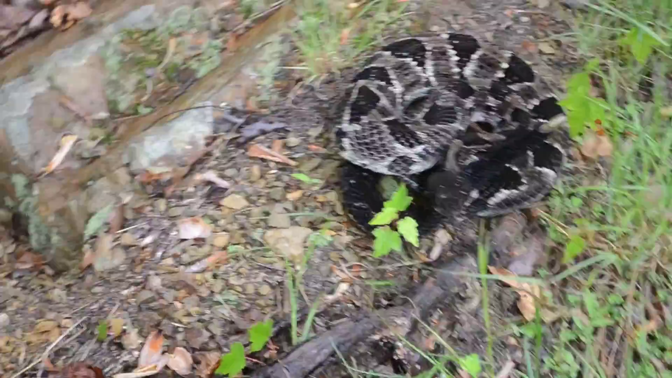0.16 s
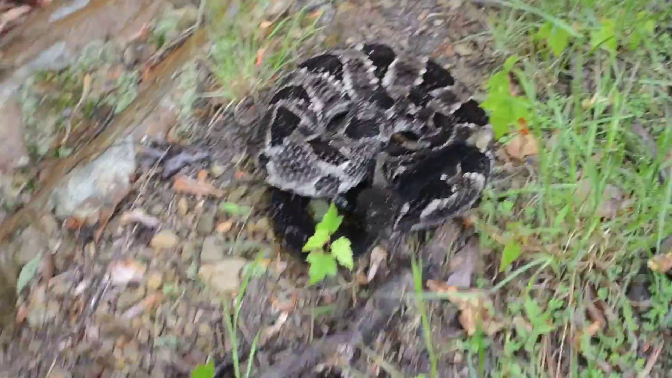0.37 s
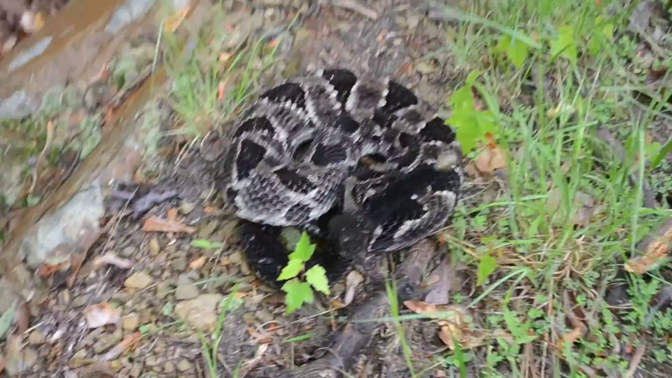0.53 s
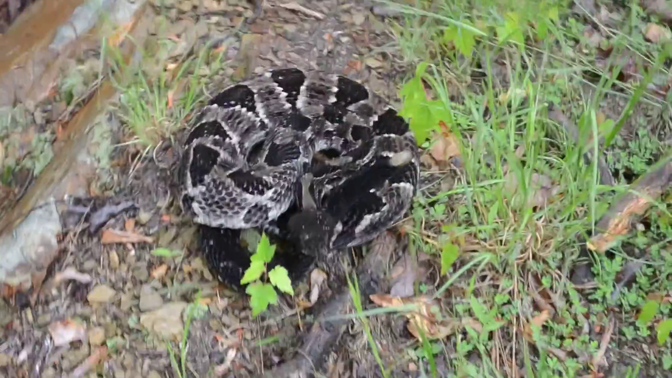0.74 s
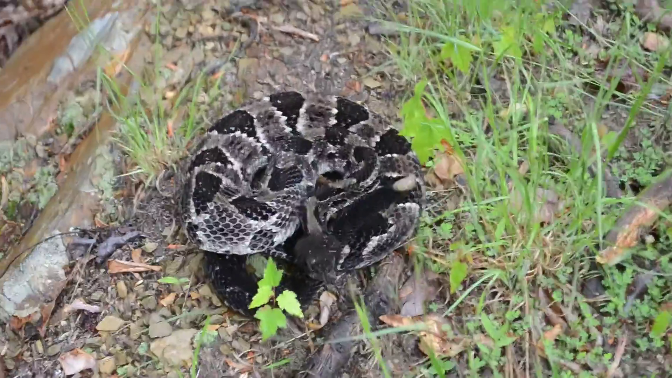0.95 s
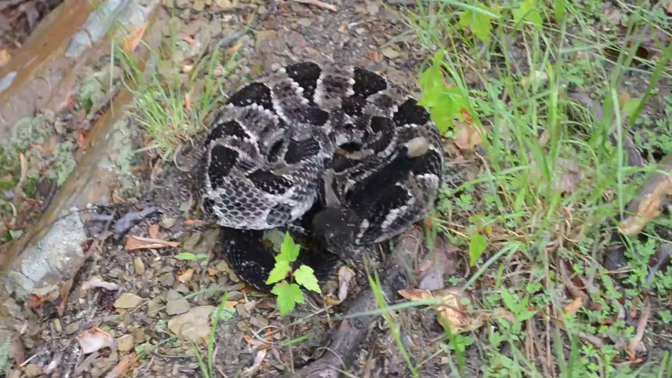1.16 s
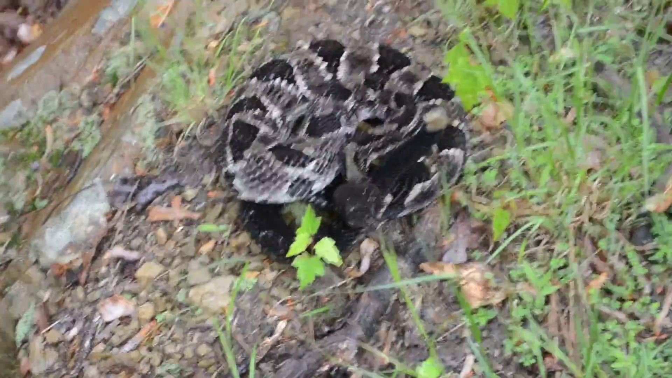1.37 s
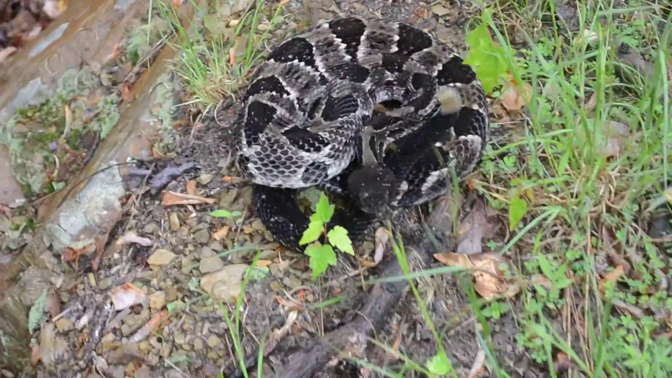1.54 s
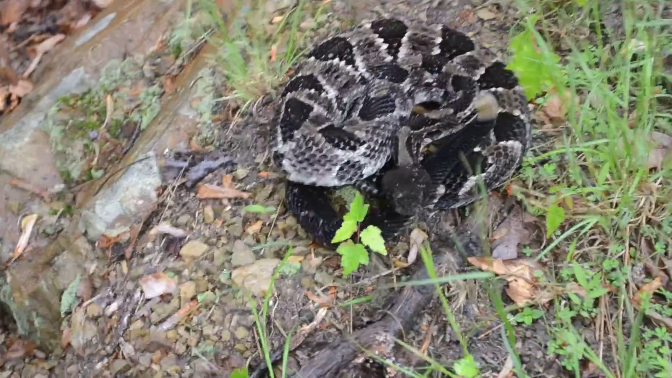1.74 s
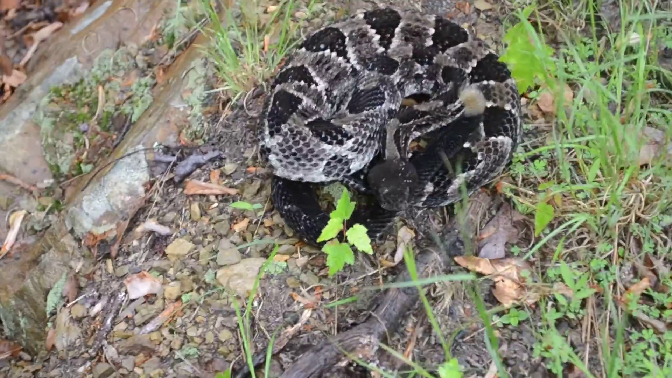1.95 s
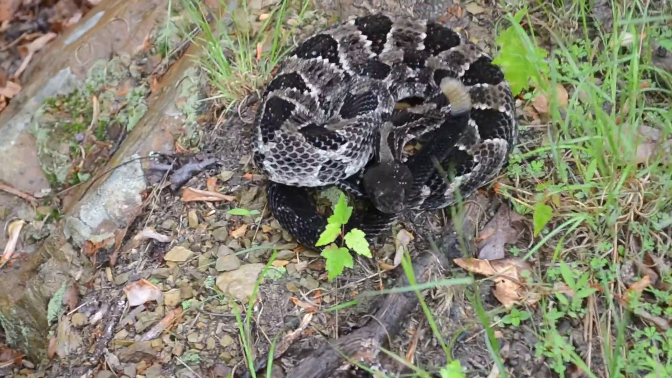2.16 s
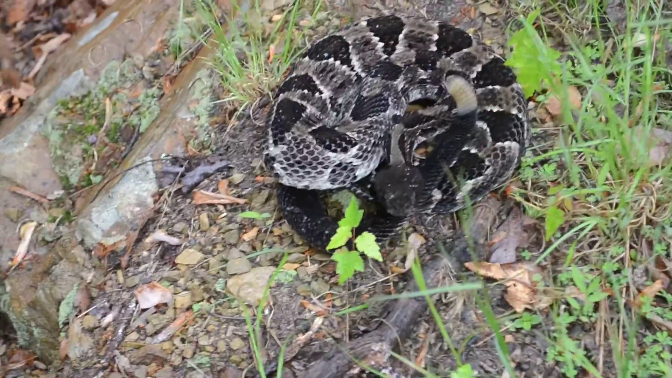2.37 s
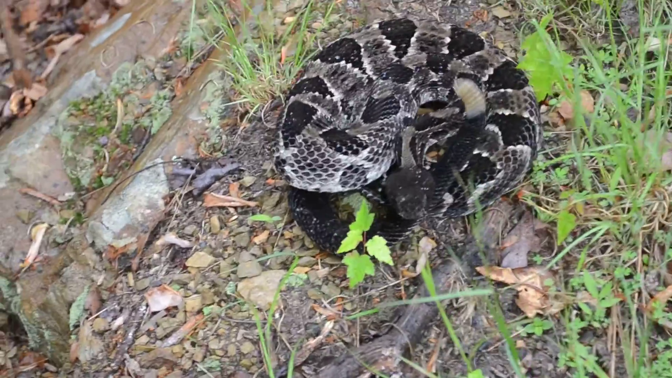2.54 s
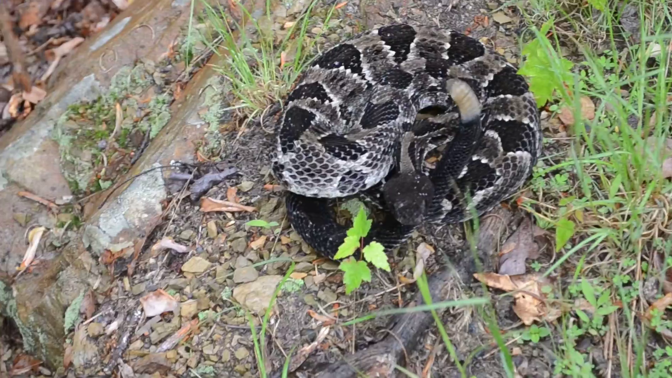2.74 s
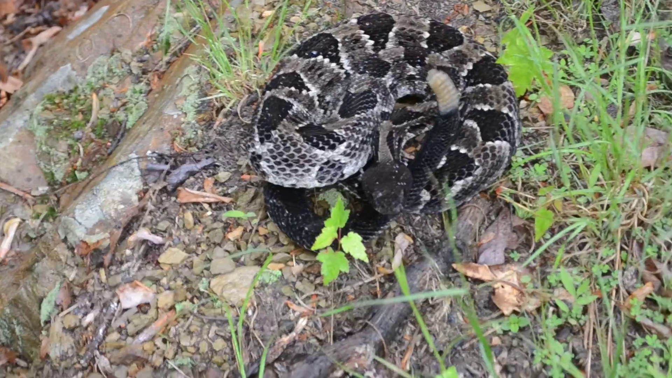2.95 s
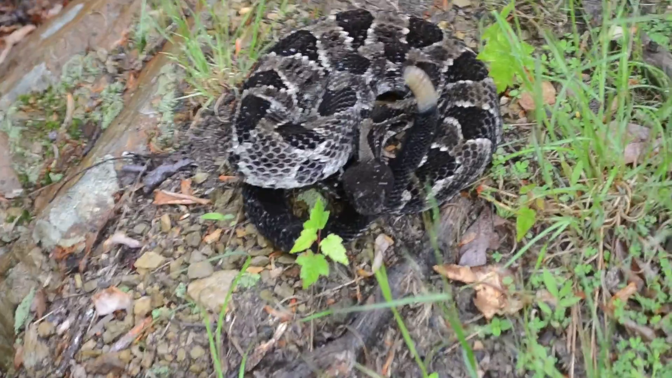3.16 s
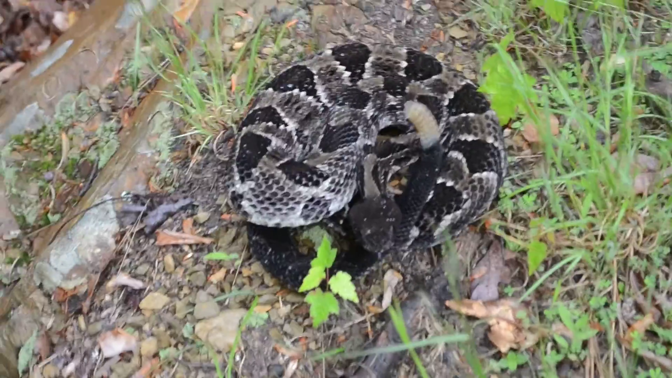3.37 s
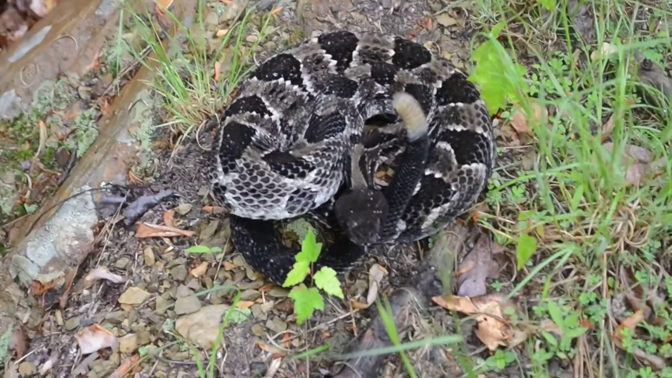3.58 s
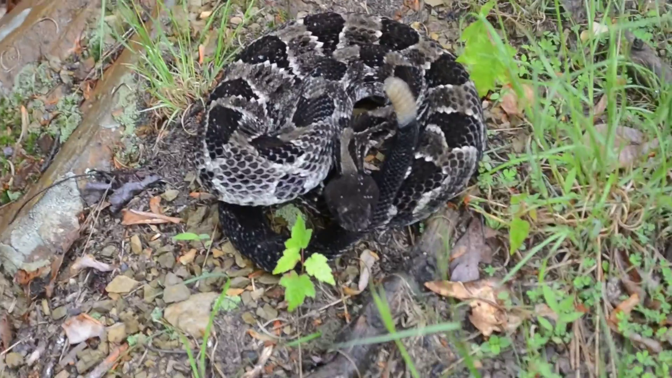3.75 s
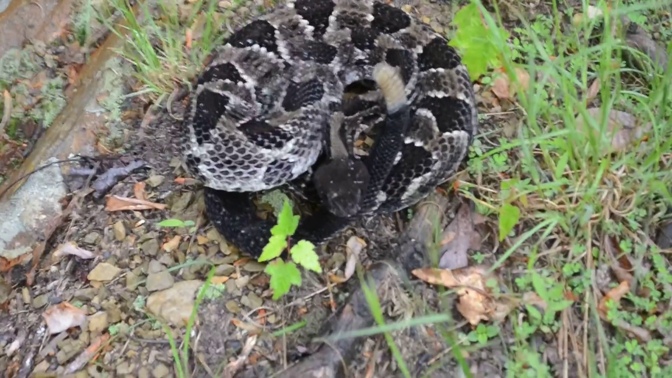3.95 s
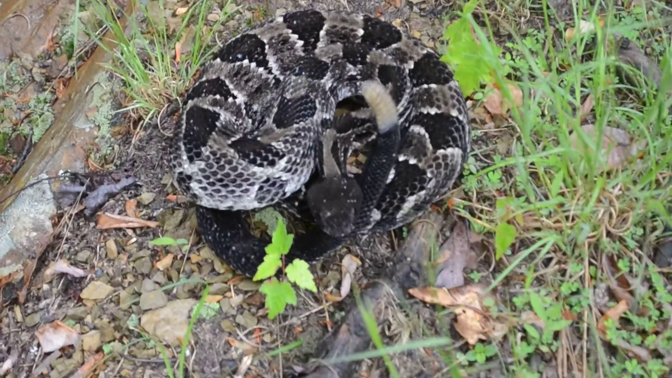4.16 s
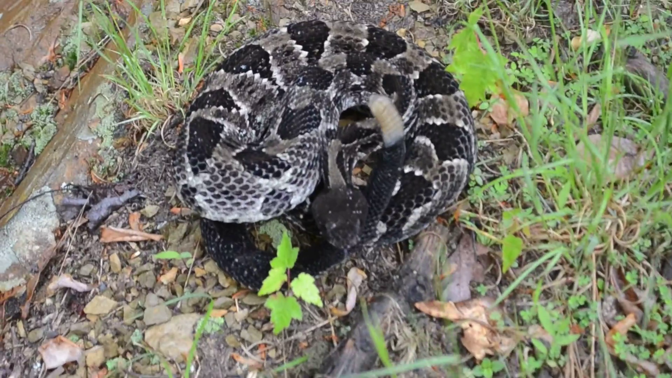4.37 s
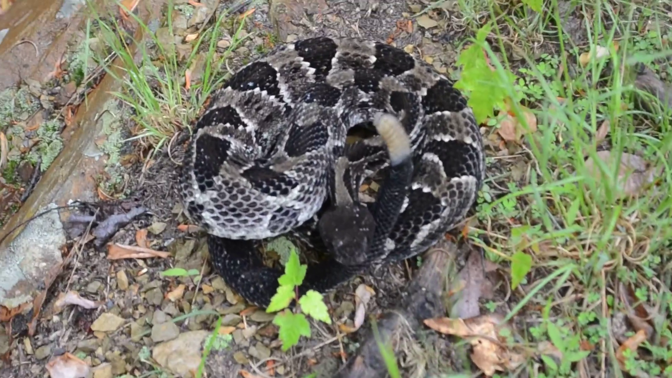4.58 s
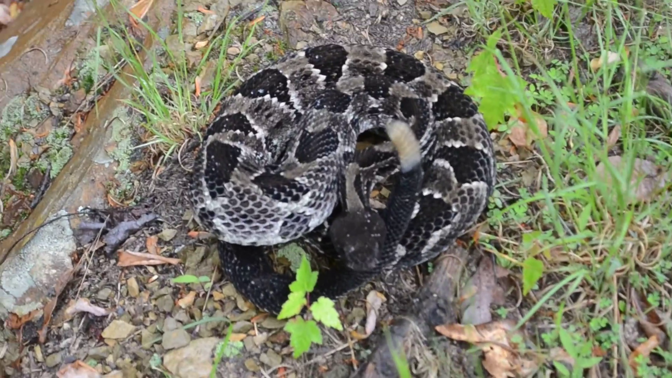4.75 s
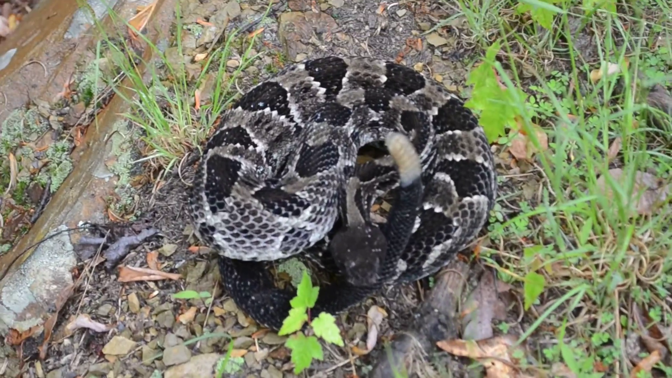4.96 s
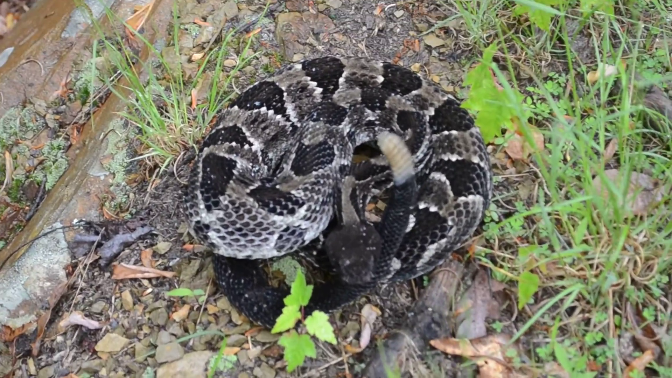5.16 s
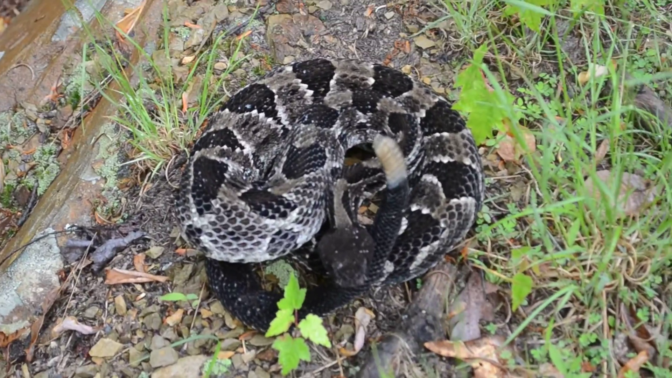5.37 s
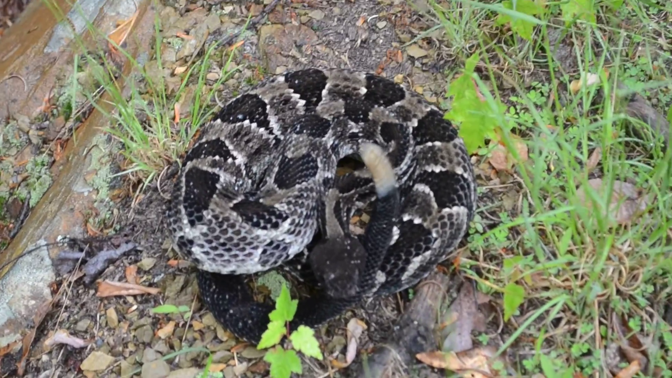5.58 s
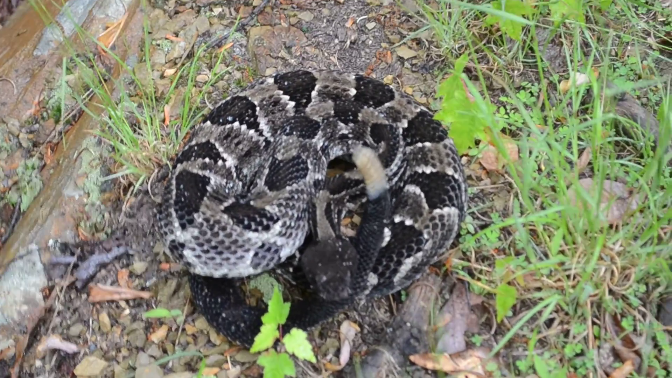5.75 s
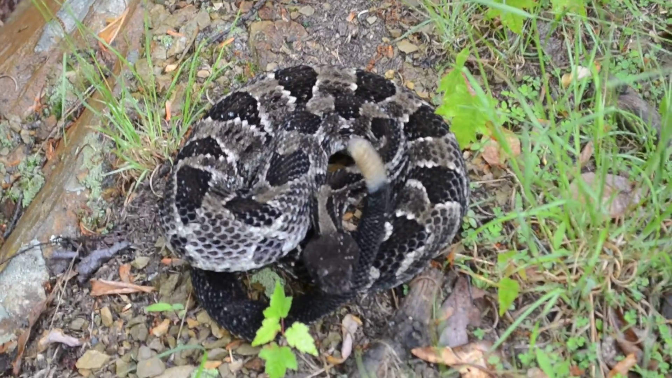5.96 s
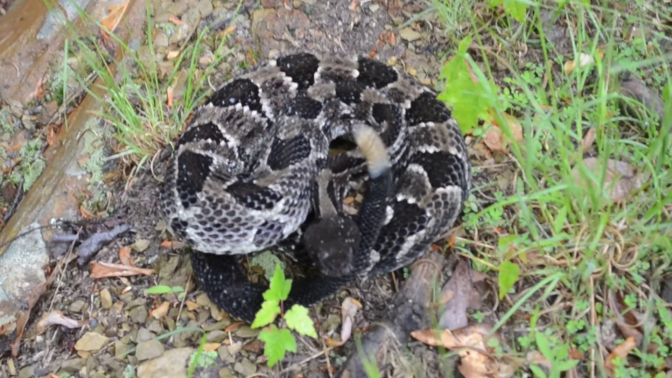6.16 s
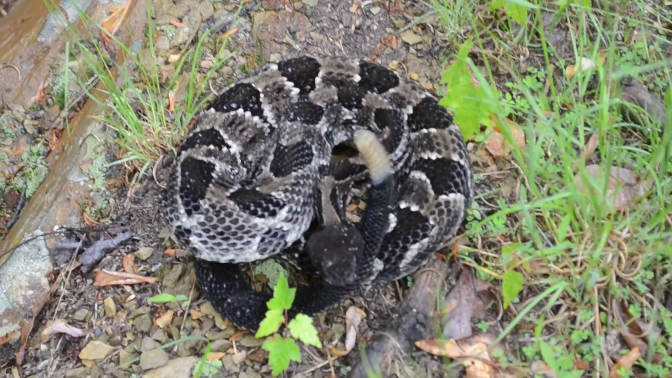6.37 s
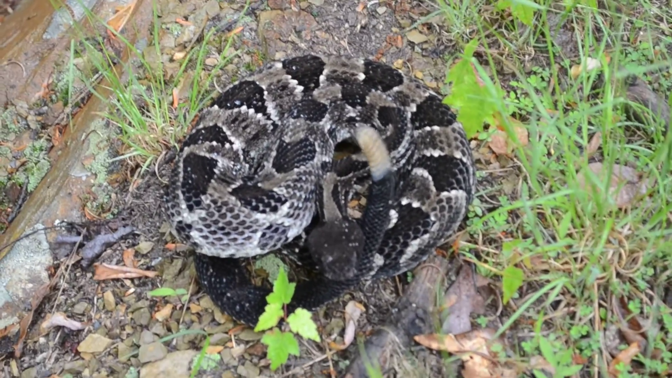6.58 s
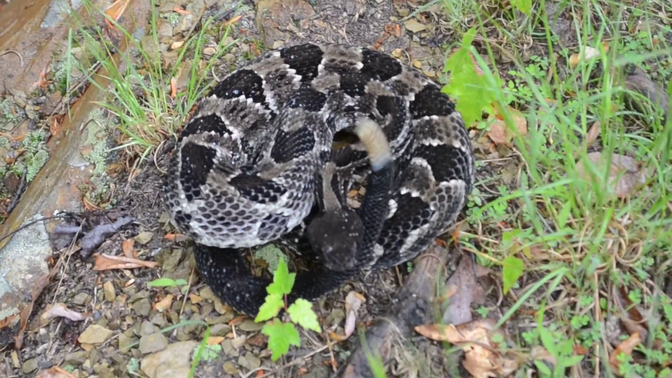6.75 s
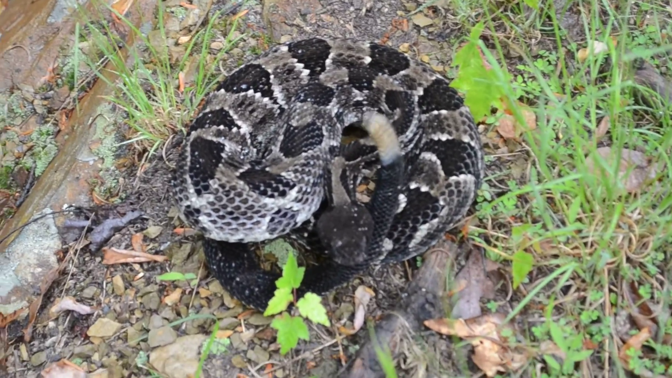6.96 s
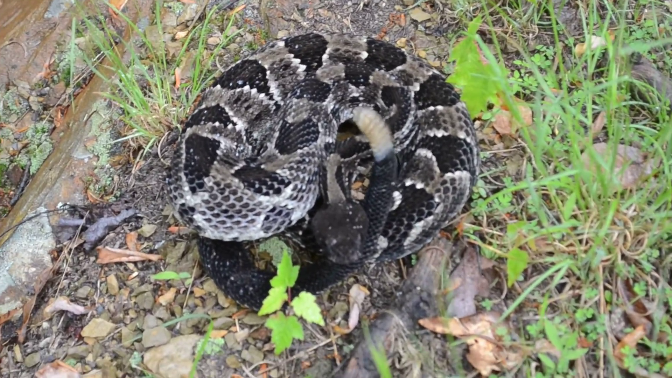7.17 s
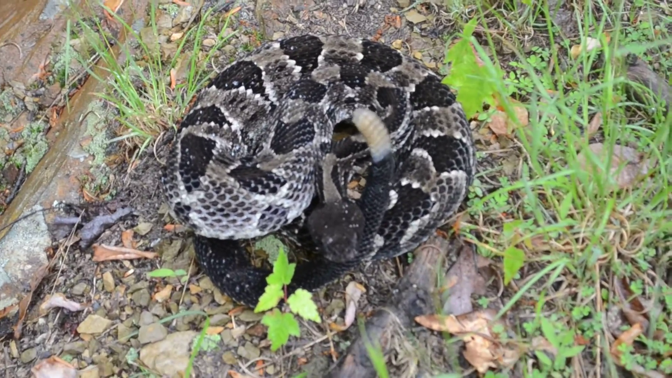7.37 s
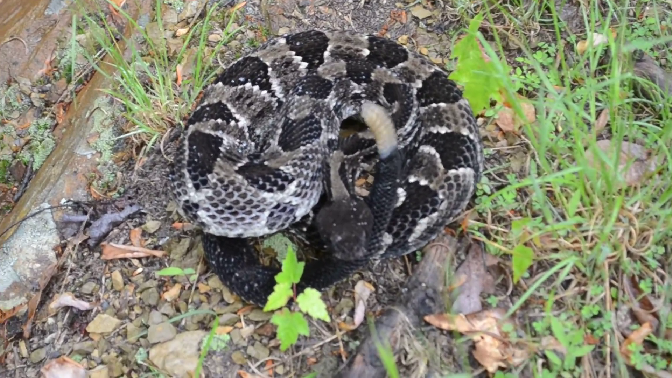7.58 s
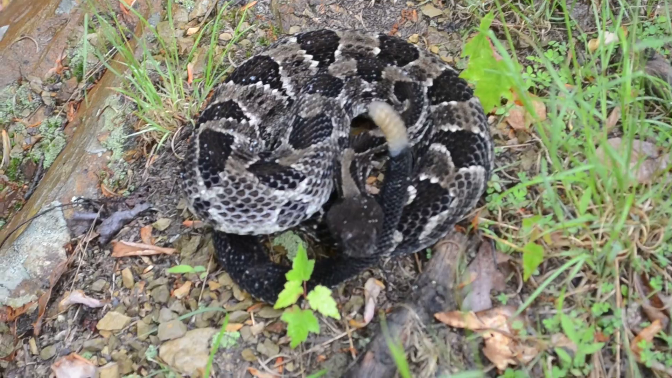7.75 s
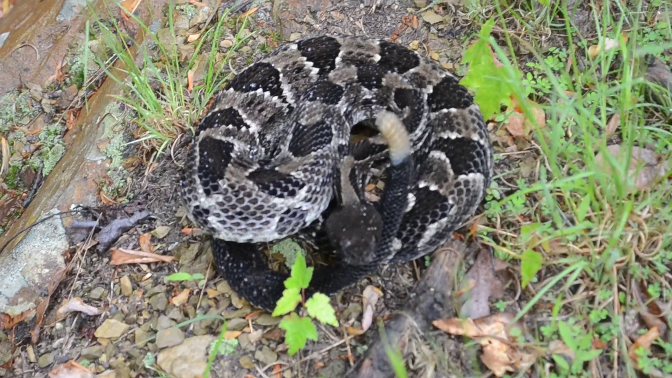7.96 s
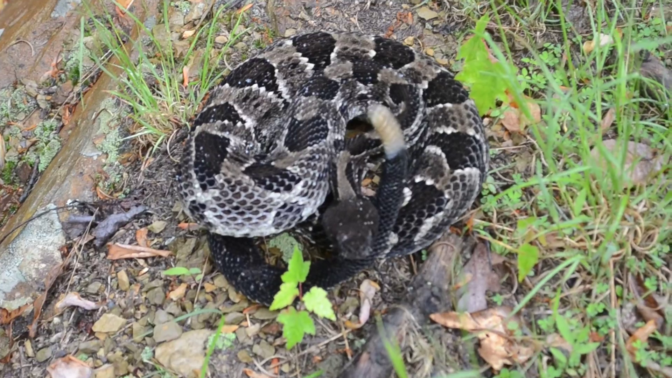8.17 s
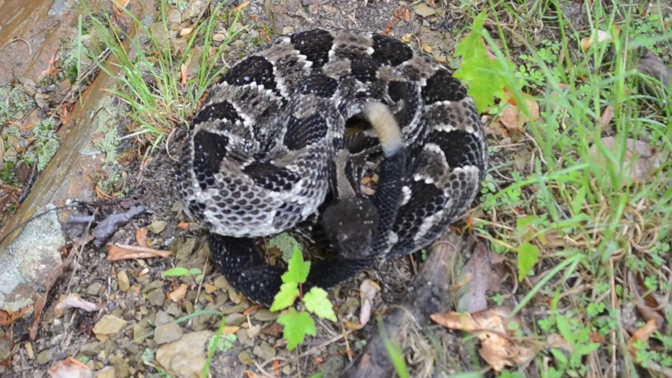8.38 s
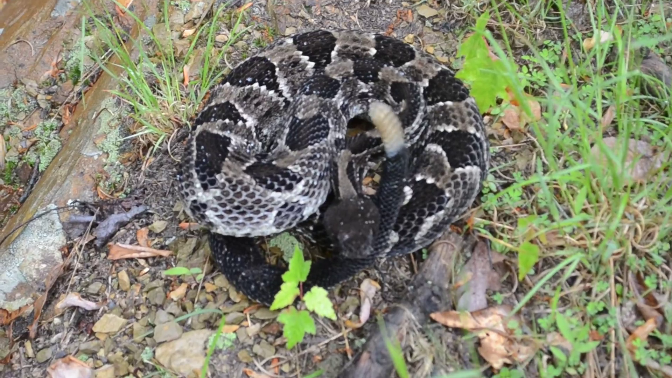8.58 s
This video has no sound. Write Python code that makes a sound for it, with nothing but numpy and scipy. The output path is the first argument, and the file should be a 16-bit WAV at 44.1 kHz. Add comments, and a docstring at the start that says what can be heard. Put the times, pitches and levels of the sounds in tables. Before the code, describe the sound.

A coiled rattlesnake buzzes its tail in a steady, dry, high rattle outdoors, brightening slightly, with faint handling clicks on the camera close by.

```python
"""Rattlesnake buzz outdoors

A coiled rattlesnake shakes its tail about fifty times a second on stony ground: crowds of shell contacts
excite short, overlapping modes. The tail rises and turns towards a hand-held camera, so the buzz brightens.
Below it lie outdoor air and wind rumble (band-passed noise), fingers sliding (sparse impulses) and tapping
(clicks with a decaying ring) on the camera body, and faint sine tones that come and go."""
import sys
import numpy as np
from scipy import signal
from scipy.io import wavfile
from scipy.ndimage import uniform_filter1d

SR = 44100
rng = np.random.default_rng(int(sys.argv[2]) if len(sys.argv) > 2 else 0)


def elevation(decibels):
    """Turn decibel levels (scalar or array-like) into linear amplitude ratios."""
    levels = np.asarray(decibels, float)
    return 10 ** (levels / 20)


def file_out(sig):
    """Save sig as 16-bit WAV at sys.argv[1]."""
    # one column per channel
    cols = np.atleast_2d(sig).T
    # limit, then scale
    lim = np.clip(cols, -1, 1)
    pcm = np.round(lim * 32767).astype(np.int16)
    wavfile.write(sys.argv[1], SR, pcm)


N = 380141


def rms_one(x):
    """Normalization: scale to unit root-mean-square value."""
    return x / np.sqrt(np.mean(x ** 2) + 1e-20)


def in_time(rows):
    """Linear interpolation in time: table columns, one value per sample."""
    s, *columns = np.transpose(rows)
    return [np.interp(np.arange(N) / SR, s, c) for c in columns]


def at_hz(rows, hz):
    """Interpolation on a logarithmic frequency axis: table columns at hz."""
    f, *columns = np.transpose(rows)
    return [np.interp(np.log(hz), np.log(f), c) for c in columns]


def band(x, low_hz, high_hz, order=2):
    """Causal Butterworth band-pass filtering."""
    sections = signal.butter(order, [low_hz, high_hz], "band", fs=SR, output="sos")
    return signal.sosfilt(sections, x)


def drift(rate_hz):
    """Slow random modulation: two-pole low-passed noise of unit rms, drawn every 40 samples."""
    r = np.exp(-80 * np.pi * rate_hz / SR)
    noise = rng.standard_normal(N // 40 + 2002)
    slow = signal.lfilter([1], [1, -2 * r, r * r], noise)[2000:]  # skip the filter's onset
    return np.interp(np.arange(N) / 40, np.arange(len(slow)), rms_one(slow))


def spells(rows, fade_s):
    """Amplitude envelope: fade in, hold and fade out for each row of start, length, level."""
    t = np.arange(N) / SR
    gain = 0
    for s, length, db in rows:
        corners = [s, s + fade_s, s + max(length, fade_s), s + length + fade_s]
        gain = gain + elevation(db) * np.interp(t, corners, [0, 1, 1, 0])
    return gain


# tail oscillation, two strokes per swing: (t/s, swing rate f/Hz)
SWING_RATE = [(0.0, 52.9), (0.25, 54.14), (0.5, 52.75), (1.25, 51.41), (1.75, 51.68), (3.0, 49.95),
              (4.0, 50.69), (4.5, 50.68), (4.75, 49.39), (6.75, 47.51), (7.75, 47.53), (8.62, 46.62)]
# posture: (t/s, facing 0 low and aside to 1 raised, treble level/dB as the camera closes in,
#           lean -1 forward stroke to 1 back stroke louder)
TAIL_POSTURE = [(0, 0.16, -5.5, -0.62), (.25, 0, -1.5, -1), (.6, 0, 0.5, -1), (1.3, 0.21, -0.5, -0.71),
                (2.2, 0.23, 0, -0.52), (2.9, 0.58, -1.5, -0.24), (3.4, 0.71, -1.5, -0.1),
                (3.9, 0.78, -1.5, -0.13), (4.6, .95, -2.5, -0.018), (5.5, 1, -1.5, 0.17),
                (6.8, 1, -1, 0.67), (8.62, 1, -1, 0.44)]
# relative spectral density of the rattle, low and raised tail: (f/Hz, level/dB per Hz)
LOW_TAIL_COLOUR = [(850, -28), (1500, -25), (2000, -21), (2450, -9.5), (3000, -7.5), (3300, -17),
                   (3700, -1.5), (4100, -4.5), (5100, -7), (5650, -12), (6500, -17), (9000, -16),
                   (10500, -20.5), (11300, -39.5), (12700, -66)]
RAISED_TAIL_COLOUR = [(850, -32), (1300, -27.5), (1750, -18.5), (2050, -13.5), (3000, -11), (3800, -7),
                      (4600, -3.5), (5000, 2), (5450, -4), (5750, -9.5), (7300, -11), (9000, -11.5),
                      (10500, -18.5), (11300, -31), (12700, -59)]
# clatter shape; twice per swing the shells pile up, then fly free: (share of swing, level/dB before scaling)
CLATTER_SHAPE = [(0, 2), (.05, 3), (.11, 0), (.19, -5.5), (.27, -4), (.35, -.5), (.45, 1.5), (.52, 3),
                 (.58, 2), (.67, -5), (.75, -3), (.84, -2.5), (.92, .5)]
# how shell modes follow the swing: (f/Hz, depth factor, lean level/dB, loose-shell knock level/dB,
#                                    lead/swings)
SHELL_MODES = [(1200, .6, -1, 0, .04), (2000, 1.1, -3.5, 0, .045), (3000, .75, -2, 0, .035),
               (4000, .65, -.3, 2.5, 0), (5100, .6, 0, 4.5, 0), (7000, .85, -1.8, 1.5, .015),
               (9500, .6, 0, .5, 0)]
# buzz envelope: (t/s, level/dB)
BUZZ_LEVEL = [(0.0, -41), (0.07, -41), (0.31, -38.5), (1.24, -37), (2.93, -36.5), (4.0, -34.5),
              (8.62, -34.5)]
SWING_START = -.205  # swings
BASE_CONTACTS_PER_S = 11000  # before crowding


def rattle():
    """Modal excitation: shell contacts crowd twice per swing and ring short, overlapping modes."""
    swing = SWING_START + np.cumsum(in_time(SWING_RATE)[0]) / SR + .005 * drift(15)
    share, clatter_db = np.transpose(CLATTER_SHAPE)
    crowding = elevation(.5 * np.interp(swing, share, clatter_db, period=1))
    at = np.flatnonzero(rng.random(N) < BASE_CONTACTS_PER_S * crowding / SR)
    swing = swing[at]
    facing, treble_db, lean = np.array(in_time(TAIL_POSTURE))[:, at]
    # a loose shell catches up on the back stroke
    knock = facing ** .5 * np.exp(-((swing % 1 - .75) / .04) ** 2)
    vigour_db = .5 * drift(95)[at]  # no two strokes are alike
    contact_db = 0.8 * np.minimum(rng.exponential(1, len(at)), 4)
    force = elevation(vigour_db + contact_db)
    common, out = rng.standard_normal(len(at)), 0
    modes_hz = np.r_[1000:6200:200, 6300:13700:400]
    for hz, spacing in zip(modes_hz, np.gradient(modes_hz)):
        depth, lean_db, knock_db, lead = at_hz(SHELL_MODES, hz)
        phase = swing + lead
        # crisper while the tail is low
        beat_db = depth * (1.5 - .5 * facing) * np.interp(phase, share, clatter_db, period=1)
        # one stroke hits harder than its return
        beat_db += lean_db * lean * np.cos(2 * np.pi * phase)
        beat = rms_one(force * elevation(beat_db + knock_db * knock))
        low_db, raised_db = at_hz(LOW_TAIL_COLOUR, hz)[0], at_hz(RAISED_TAIL_COLOUR, hz)[0]
        colour_db = (1 - facing) * low_db + facing * raised_db
        colour_db += treble_db * np.clip((hz - 4000) / 1500, 0, 1)
        # each contact favours other modes
        favour = 0.27 * common + rng.standard_normal(len(at))
        blows = np.full(N, 1e-18)
        blows[at] = elevation(colour_db) * beat * favour
        out = out + np.sqrt(spacing) * band(blows, hz - 200, hz + 200)
    power = uniform_filter1d(out ** 2, size=SR // 2)
    loudness = np.sqrt(uniform_filter1d(power, size=SR // 2))
    return elevation(in_time(BUZZ_LEVEL)[0]) * out / loudness


# relative spectral density of outdoor air: (f/Hz, level/dB per Hz)
AIR_COLOUR = [(20, -16), (45, -4), (100, -8), (180, 0.5), (400, 0), (800, 2), (1300, -4.5), (1800, -11)]


def air():
    """Broadband noise: independent half-octave bands whose levels waver a little."""
    edges, out = 20 * 2 ** np.arange(0, 6.6, .5), 0
    for low, high in zip(edges, edges[1:]):
        level_db = at_hz(AIR_COLOUR, np.sqrt(low * high))[0] + 1.0 * drift(3.7)
        out = out + elevation(level_db) * band(rng.standard_normal(N), low, high)
    return elevation(-67) * rms_one(out)


# wind rumble before its waver: (t/s, level/dB)
WIND_LEVEL = [(0, -72), (.8, -79), (1.8, -80), (2.6, -73), (3.6, -74), (4.3, -80), (5.3, -79), (6.5, -74),
              (7.75, -81), (7.9, -72), (8.2, -65), (8.62, -66)]


def wind():
    """Turbulent pressure: low band-passed noise swells in lumps on the microphone."""
    rumble = rms_one(band(rng.standard_normal(N), 75, 139))
    return rumble * elevation(in_time(WIND_LEVEL)[0] + 1.5 * drift(6))


# fingers shift their grip: (start t/s, length t/s, level/dB, centre f/Hz)
GRIP_SHIFTS = [(.15, .65, -74, 450), (1.3, .28, -68.5, 520), (1.58, 0.09, -64, 480),
               (1.697, 0.068, -70, 500), (3.11, .1, -65.5, 516), (5.68, .12, -64.5, 427),
               (7.85, 0.31, -69, 320), (8.57, .05, -63, 480)]


def grip():
    """Stick-slip friction: sparse random impulses of sliding skin, band-passed over a steady rustle."""
    slips = (rng.random(N) < 1500 / SR) * rng.standard_normal(N) + 1e-18
    out = elevation(-72) * rms_one(band(slips, 278, 703))  # steady faint rustle
    for *spell, hz in GRIP_SHIFTS:
        rub = rms_one(band(slips, hz / 1.3, hz * 1.3))
        out = out + spells([spell], fade_s=0.035) * rub
    return out


# spells of the faint hum, added to its steady floor: (start t/s, length t/s, rms level/dB before waver)
HUM_SPELLS = [(.27, 0.42, -74), (.93, .08, -74), (1.09, .2, -77), (1.83, 0.12, -70), (2.46, 0.15, -75),
              (2.8, .4, -74), (3.4, .07, -70), (3.63, 0.36, -72.5), (4.21, 0.34, -71), (4.85, .3, -77),
              (5.53, 0.27, -70.5), (6.15, 0.4, -71.5), (6.87, .26, -70.5), (7.28, 0.4, -70.5),
              (7.93, 0.26, -71), (8.37, .3, -70.5)]
# a lower thin tone shows once: (start t/s, length t/s, rms level/dB)
LOW_TONE_SPELL = [(4.75, 0.51, -76)]
HUM_START_HZ, HUM_CLIMB_HZ_PER_S, HUM_FLOOR_DB = 649, 2.6, -83.5
LOW_TONE_HZ, TONE_FADE_S = 487, 0.048


def hum():
    """Frequency and amplitude modulation: a thin tone near 660 Hz climbs slowly and wavers."""
    t = np.arange(N) / SR
    hz = HUM_START_HZ + HUM_CLIMB_HZ_PER_S * t + 1.7 * drift(7.5)
    gain = (elevation(HUM_FLOOR_DB) + spells(HUM_SPELLS, TONE_FADE_S)) * elevation(1.5 * drift(6.5))
    tone = gain * np.sin(2 * np.pi * np.cumsum(hz) / SR)
    low_tone = spells(LOW_TONE_SPELL, TONE_FADE_S) * np.sin(2 * np.pi * LOW_TONE_HZ * t)
    return np.sqrt(2) * (tone + low_tone)


# taps on the camera body: (t/s, reference level/dB before the thud and ring shares, f/Hz)
FINGER_TAPS = [(0.176, -44, 408), (0.555, -38, 1210), (0.717, -46, 654), (3.159, -36, 1000),
               (3.233, -43, 560), (3.543, -34, 850), (3.784, -45, 1000), (5.499, -39, 1320),
               (5.686, -47, 336), (5.741, -52, 487), (5.77, -50, 700), (5.777, -47.5, 320),
               (8.043, -45, 800)]
TAP_T60_S = 0.035  # time for the ring to fall by 60 dB


def taps():
    """Impulse response: a finger's click rings the plastic shell over a broad range."""
    out, t = np.zeros(N + SR), np.arange(SR // 5) / SR
    for s, level_db, hz in FINGER_TAPS:
        thud = band(1.0 * (t == 0), 0.38 * hz, 1.8 * hz)
        thud = thud / np.abs(thud).max()
        ring = np.sin(2 * np.pi * hz * t) * elevation(-60 * t / TAP_T60_S)
        i = round(s * SR)
        out[i:i + len(t)] += elevation(level_db) * (0.14 * ring + 0.77 * thud)
    return out[:N]


def scene():
    """Linear superposition: the rattle over the quiet layers, in one channel."""
    return (rattle() + air() + wind() + grip() + hum() + taps())[None]


# dips of the microphone port and the recorder's filter: (f/Hz, width f/Hz, level/dB)
PORT_DIPS = [(7880, 350, -7), (11950, 700, -30), (12050, 700, -30)]


def port_dips(sound):
    """Pole-zero notch filtering: zeros nearer the unit circle than their poles cut narrow dips."""
    for hz, width_hz, dip_db in PORT_DIPS:
        w = 2 * np.pi * hz / SR
        zero, pole = np.exp(-np.pi * width_hz * np.array([elevation(dip_db), 1]) / SR)
        zeros = [1, -2 * zero * np.cos(w), zero ** 2]
        poles = [1, -2 * pole * np.cos(w), pole ** 2]
        sound = signal.lfilter(zeros, poles, sound)
    return sound


def band_limit(x):
    """A steep low-pass at the top of the band."""
    return signal.sosfilt(signal.butter(12, 13480, fs=SR, output="sos"), x)


def record(dry):
    """Linear filtering: narrow dips colour the treble of the finished mix."""
    mix = port_dips(dry)
    return band_limit(mix)


dry = scene()
out = record(dry)
file_out(out)
```